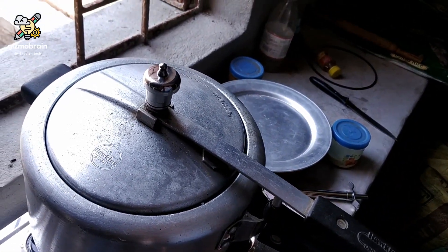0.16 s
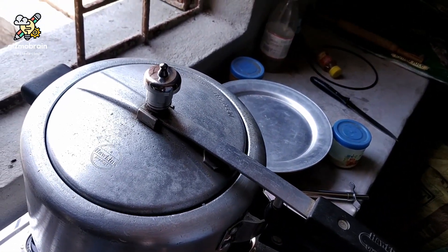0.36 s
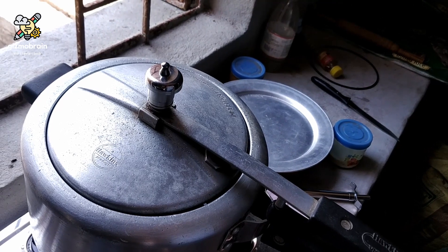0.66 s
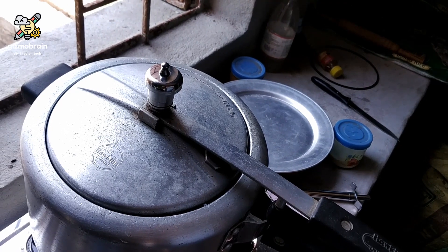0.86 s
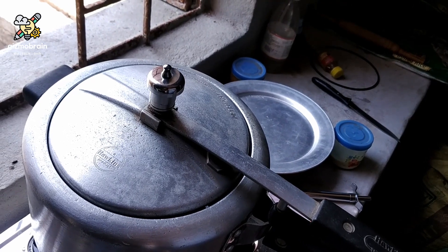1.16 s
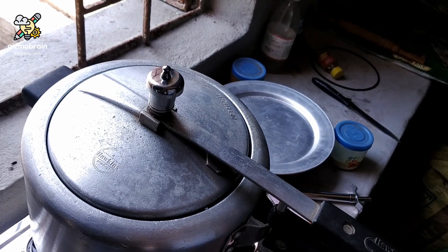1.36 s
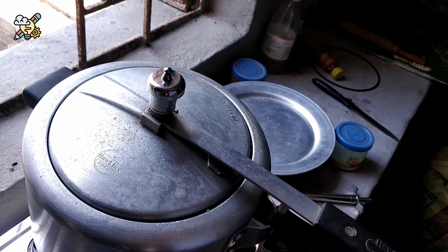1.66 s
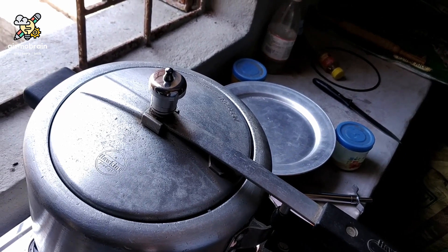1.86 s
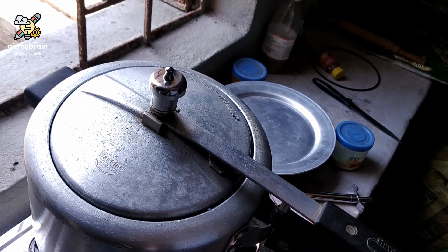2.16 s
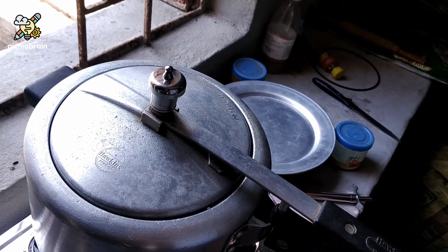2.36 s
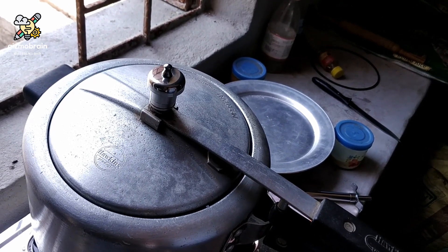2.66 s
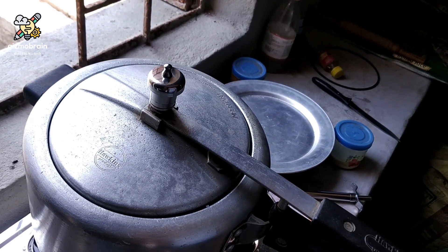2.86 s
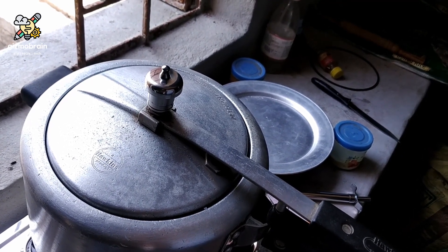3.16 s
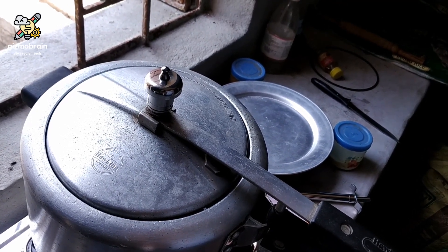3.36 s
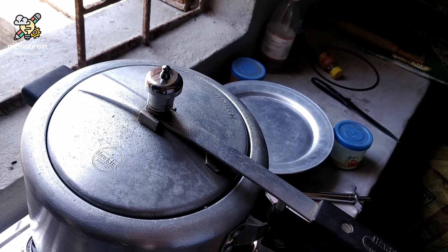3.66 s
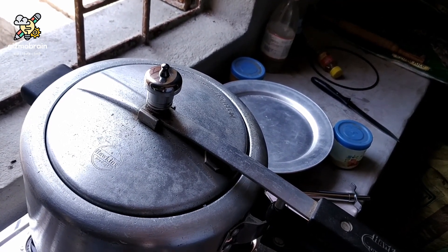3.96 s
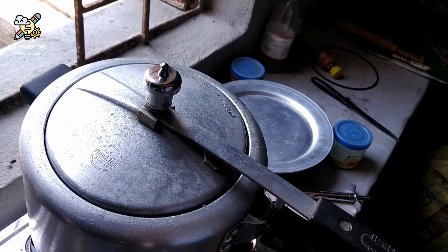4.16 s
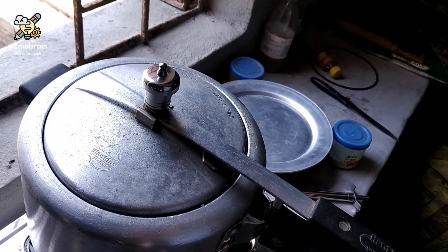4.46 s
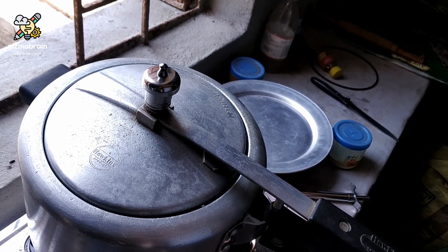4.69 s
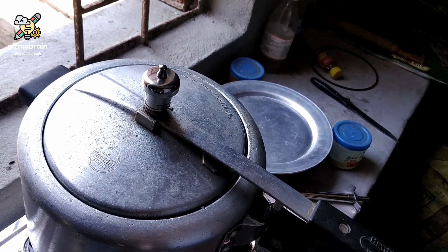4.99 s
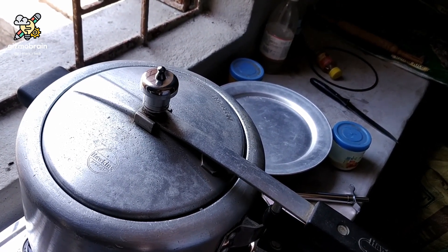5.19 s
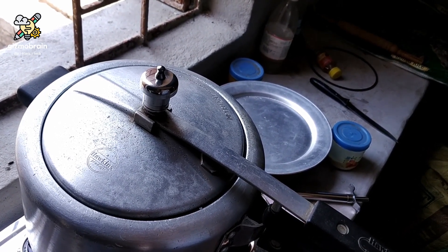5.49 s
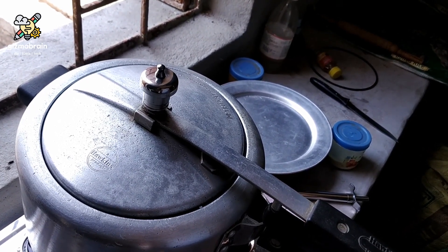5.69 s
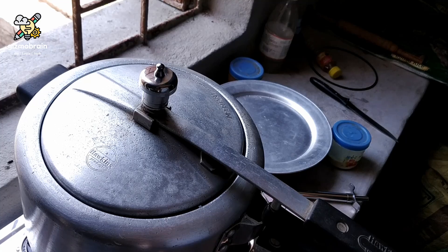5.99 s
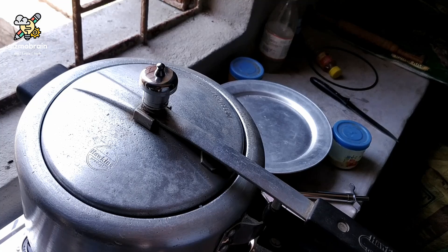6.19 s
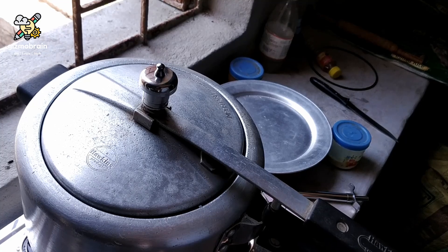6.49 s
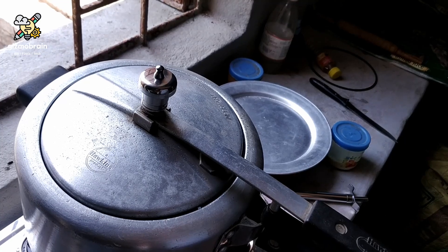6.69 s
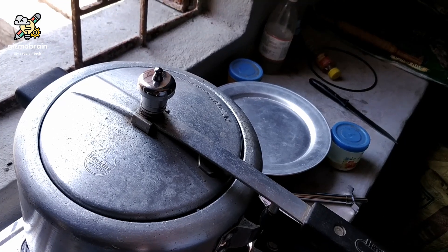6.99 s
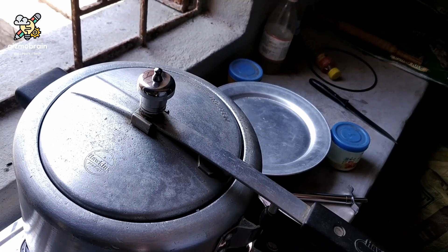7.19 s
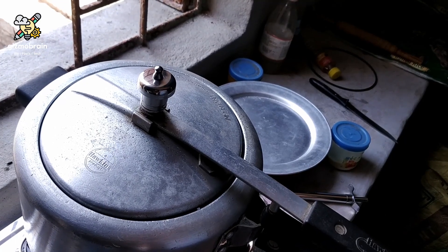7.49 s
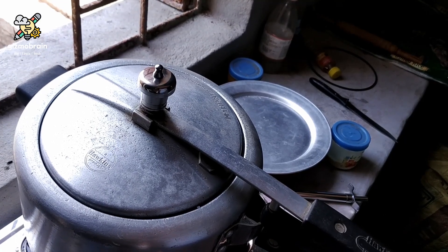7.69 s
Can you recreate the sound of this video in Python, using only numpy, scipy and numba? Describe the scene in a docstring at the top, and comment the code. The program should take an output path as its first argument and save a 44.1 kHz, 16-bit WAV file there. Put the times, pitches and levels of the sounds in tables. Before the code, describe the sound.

Close, bright pressure cooker hiss with wet metallic sputter, two tiny early peeps, a strong burst near two seconds, then a long gradual fade.

```python
"""Steam leaks past the weight of a pressure cooker: its turbulent jet hisses in the treble as noise in bands.
Wet sputter under the weight, uneven noise, sets the modes of the metal lid and weight ringing.
A gas flame rumbles as low noise with two resonances and hums the modes of the pot.
Gliding tones make a few gurgling bubbles inside and two short peeps of the weight.
All reaches one close phone microphone; now and then nearly all but the treble drops out for an instant."""
import sys
import numpy as np
from scipy import signal
from scipy.fft import rfft, irfft
from scipy.io import wavfile
from scipy.ndimage import uniform_filter1d
from numba import njit

SR = 44100
rng = np.random.default_rng(int(sys.argv[2]) if len(sys.argv) > 2 else 0)


def generate_wav(sig):
    """Save sig (samples, or channels by samples) to the path in sys.argv[1] as 16-bit PCM at SR."""
    pcm = np.round(np.clip(np.atleast_2d(sig).T, -1, 1) * 32767).astype(np.int16)
    wavfile.write(sys.argv[1], SR, pcm)


N = 345744
TOP_HZ = 11250  # upper limit of the hiss bands and of the phone


def steam():
    """Jet noise and impact-driven ringing share one leak, whose spurts lift each by its own amount."""
    # gains of the leak: start_s, sputter_db, jet_db
    leak = [(0, -49.5, -43), (.3, -52.5, -43.5), (.55, -52.5, -42), (.62, -56, -50), (.8, -56, -47.5),
            (.96, -55.5, -44.5), (1.22, -52.5, -43), (1.44, -51, -42.5), (1.55, -42, -41),
            (1.68, -38, -36.5), (1.79, -41, -42.5), (1.92, -41, -35.5), (2.07, -39.5, -36.5),
            (2.14, -41.5, -40.5), (2.33, -41, -42), (2.37, -45, -40), (3.2, -46, -38.5), (3.55, -46.5, -41),
            (5.0, -51, -43.5), (6.1, -53.5, -45.5), (6.95, -56.5, -45), (7.84, -57.5, -48.5)]
    # spurts of steam, a swell and fall: centre_s, length_s, sputter_rise_db, jet_rise_db, whistle_rise_db
    spurts = [(0.05, 0.13, -0.5, 3, -13), (0.243, 0.12, 1, 3, 3), (0.361, 0.044, 5.5, 1.5, -2),
              (0.414, 0.035, 1, 5, 7), (1.014, 0.18, 7, 1, -15), (1.138, 0.1, 5, 1, -3),
              (1.628, 0.082, 1, -0.5, 7), (1.83, 0.069, 1.5, -4, 7), (1.913, 0.16, 0, -0.5, 7),
              (2.035, 0.11, 2, 1, 2), (2.14, 0.058, 2, -1, 3.5), (2.279, 0.11, -1, 2.5, 8.5),
              (2.45, 0.073, 1.5, 0.5, 3), (2.747, 0.065, 4, 0, -1), (2.84, 0.076, 3.5, 0.5, 3),
              (3.186, 0.13, 1, 2, -12), (3.514, 0.17, 1.5, -0.5, 2), (3.606, 0.068, 1, 0, 8),
              (3.804, 0.11, 1.5, -1.5, 6), (3.88, 0.072, 3.5, -2.5, -6), (4.683, 0.15, 2.5, -1.5, -2),
              (5.501, 0.21, 0, 3, 9.5), (5.862, 0.049, 1.5, 1.5, -3), (6.511, 0.046, 0, 1, 14),
              (6.61, 0.064, 2, -1, 3), (7.452, 0.065, 0, -2, 11.5)]
    wet_db, dry_db = curve(leak)
    centre_s, length_s, *rises_db = np.transpose(spurts)
    wet_rise, dry_rise, whistle_rise = (bumps(centre_s, length_s, rise) for rise in rises_db)
    wet_db = wet_db + wet_rise
    # the weight whistles 1.5 dB above the sputter gain, apart from its own rises and a slight waver
    whistle_db = wet_db + 1.5 + whistle_rise + 0.15 * walk(18)
    dry_jet = undb(dry_db + dry_rise) * jet()
    return reflect(sputter(wet_db, whistle_db) + dry_jet)


def jet():
    """Turbulent mixing makes broadband noise; cavity resonances lift parts of it into humps."""
    # colour of the open jet: pitch_hz, relative_db_per_hz
    jet_colour = [(710, -64), (1200, -30), (1630, -19.5), (2820, -24.5), (4250, -13.5), (4940, -15.5),
                  (6060, -2.5), (8790, -1.5), (9920, 0), (11100, -27.5), (14400, -103), (22000, -120)]
    # cavity under the weight, relative levels: pitch_hz, width_hz, first_db, last_db
    cavity = [(7790, 180, -4, -2), (8040, 180, -5.5, 0), (8140, 76, 2.5, -3), (8540, 46, 0, -5),
              (8850, 120, -5, 4), (8940, 89, 3, 2.5), (9670, 104, -1, 2.5), (9830, 276, -1.5, -15)]
    # gain of the broad hiss beside the humps: start_s, gain_db
    broad_gain = [(0, 0), (.55, -3.5), (.7, -1), (1.5, -1.5), (2.3, 0.5), (2.6, -1), (4, 1.5), (7.84, 0.5)]
    flutter_db = 1.18 * walk(100)
    open_jet = hiss(jet_colour, flutter_db, own_db=2.5, rate=45, step=.1)
    gas = rng.standard_normal(N) * undb(flutter_db)
    humps = 0
    for hz, width, first_db, last_db in cavity:
        hump_db = np.linspace(first_db, last_db, N) + 2.4 * walk(42)
        # two filters in series narrow each other, so each is 1.5 times as wide
        humps = humps + undb(hump_db) * double_svf(gas, hz, 1.5 * width)
    return undb(curve(broad_gain)[0]) * open_jet + level(humps, -2.54)


def sputter(wet_db, whistle_db):
    """Forced modal vibration: uneven droplets ring lid and weight, and some splash radiates directly."""
    # lid and weight modes, relative levels: pitch_hz, width_hz, level_db
    modes = [(1515, 48, -20.5), (1571, 19.6, -17), (1675, 40, -18), (1885, 19, -16.5), (1904, 14, -15.5),
             (2065, 57, -16.5), (2253, 47, -21), (2386, 31, -18), (2488, 26, -16.5), (2649, 37, -17.5),
             (2933, 47, -21), (3155, 45, -15.5), (3367, 28, -14.5), (3414, 26.5, -11), (3520, 27, -14),
             (3647, 68, -17.5), (3857, 34, -12), (3960, 40, -11.5), (4150, 27.5, -7), (4292, 51, -8.5),
             (4387, 32, -8), (4684, 86, -13.5), (4985, 57, -10.5), (5274, 130, -10), (5427, 35, -8.5),
             (5586, 63, -4), (5877, 51, -6), (6040, 29, -3.5), (6200, 59, 1), (6220, 27, -2.5),
             (6440, 42, -8), (6643, 34, -13.5), (6630, 106, -4), (6670, 56, -8), (6950, 33, -7),
             (7150, 48, -14), (7600, 19, -25), (7550, 30, -8.5)]
    # colour of the splash: pitch_hz, relative_db_per_hz
    splash_colour = [(150, -43), (250, -27), (1240, -20.5), (2060, -25), (2830, -23.5), (3370, -14),
                     (4630, -11.5), (5700, -4.5), (7460, -15), (9770, -1.5), (11100, -28), (14400, -67),
                     (22000, -120)]
    # gains of the lid's ringing beside the splash: start_s, middle_modes_db, other_modes_db
    lid_gain = [(0, -7.5, 3), (.5, -8, -1), (.65, -9.5, 3.5), (1.0, -8.5, 3.5), (1.3, -10.5, 1.5),
                (1.9, -12, 3), (2.33, -12, 2.5), (2.4, -13.5, 1.5), (4, -12.5, 1), (7.84, -13, 2)]
    spit_db = 0.95 * walk(70)
    drops = rng.standard_normal(N) * undb(spit_db)
    weight = [m for m in modes if 5450 < m[0] < 6450]
    middle = [m for m in modes if 1800 < m[0] < 2800]
    other = [m for m in modes if m not in middle + weight]
    middle_db, other_db = curve(lid_gain)
    lid = undb(middle_db) * ring(middle, drops, waver_db=3.0, rate=28)
    lid = lid + undb(other_db) * ring(other, drops, waver_db=3.5, rate=24)
    splash = hiss(splash_colour, .6 * spit_db, own_db=3.0, rate=30, step=.15)
    whistle = ring(weight, drops, waver_db=4.0, rate=28)
    return undb(wet_db) * (lid + undb(-2.0) * splash) + undb(whistle_db) * whistle


def reflect(steam_sound):
    """Destructive interference: reflections off the lid cancel narrow bands of the steam."""
    # narrow gaps: pitch_hz, width_hz, depth_db
    gaps = [(2820, 77, -0.5), (3220, 65, -2.5), (6470, 170, -15), (6890, 110, -6.5), (7540, 140, -2.5),
            (8600, 73, -4), (9400, 390, -4.5)]
    for hz, width, depth_db in gaps:
        cancelled = 1 - undb(min(depth_db, 0))
        steam_sound = steam_sound - cancelled * svf(steam_sound, 1. * hz, 1. * width)
    return steam_sound


def peeps():
    """Brief near-sinusoidal oscillation: short peeps of the weight."""
    # peeps: start_s, start_hz, end_hz, length_s, peak_db
    peep_tones = [(1.004, 6330, 6330, 0.02, -39), (1.148, 6430, 6310, 0.02, -34)]
    return glides(peep_tones)


def flame():
    """Combustion noise drives resonators: a broad roar, the humming pot and two puffing resonances."""
    # levels before the trims below: start_s, rumble_db, burner_tone_db
    flame_levels = [(0, -74.5, -68.5), (.8, -67.5, -67), (1.3, -67, -62.5), (2.1, -70, -64.5),
                    (3.1, -69.5, -67), (3.6, -75.5, -80), (4.9, -81, -78.5), (5.9, -82, -78.5),
                    (7.84, -86.5, -79)]
    # puffs of the rumble: centre_s, rise_db
    puffs = [(.16, 8), (.36, 11), (1.13, 12.5), (1.68, 10), (1.82, 10), (2.74, -1), (3.15, 5), (3.97, 10),
             (4.32, 11), (4.67, 19), (4.91, 13), (5.53, 23), (5.85, 1), (6.6, 10), (6.76, 12), (7.72, 6)]
    # swells of the burner tone: centre_s, rise_db
    swells = [(.02, 30.5), (.69, 14), (1.31, 11.5), (1.96, 8), (3.69, 19), (4.06, 17), (5.67, 13),
              (6.82, 16), (7.43, 13)]
    # flame chamber, then burner resonance; nominal widths, widened below: pitch_hz, width_hz
    resonances = [(149, 14), (477, 8)]
    # colour of the broad rumble: pitch_hz, relative_db_per_hz
    rumble_colour = [(18, -64), (30, -32), (70, -22.5), (142, -3), (333, -10.5), (477, -4), (620, -12.5),
                     (964, -10.5), (1380, -17), (1500, -22), (1950, -49), (3300, -120)]
    # gain of the broad roar and humming pot, before their trims: start_s, gain_db
    roar_gain = [(0, -64.5), (.7, -67), (1.5, -64), (2.2, -65), (3.2, -67.5), (4.3, -71), (5.3, -74.5),
                 (6.3, -76.5), (7.84, -80)]
    # pot body modes, relative levels: pitch_hz, width_hz, level_db
    pot_modes = [(166, 7.3, -10), (180.8, 9.1, 0), (235, 12.4, -0.5), (297.4, 9.4, 0), (330, 13, -5.5),
                 (390, 8.7, -3), (426, 30, -4), (458, 11, 2), (491, 10, -5.5), (540, 23, -8), (573, 21, -3),
                 (663, 24, -6.5), (804, 27, -2.5), (894, 23, -7.5), (980, 16, -9), (1134, 32, -7),
                 (1150, 21, -27), (1314, 26, -7.5)]
    rumble_db, tone_db = curve(flame_levels)
    puff_s, puff_rise_db = np.transpose(puffs)
    swell_s, swell_rise_db = np.transpose(swells)
    rumble_db = rumble_db + bumps(puff_s, 0.16, puff_rise_db)
    tone_db = tone_db + bumps(swell_s, 0.12, swell_rise_db)
    low, tone = (level(double_svf(rng.standard_normal(N), hz, 1.9 * width) * undb(2.0 * walk(12)), 0)
                 for hz, width in resonances)
    flicker_db = 1.7 * walk(10)
    broad = hiss(rumble_colour, flicker_db, own_db=0.5, rate=7, step=0.488)
    pot = ring(pot_modes, rng.standard_normal(N) * undb(flicker_db), waver_db=3.5, rate=8)
    roar = undb(curve(roar_gain)[0]) * (undb(-3.0) * broad + undb(-2.5) * pot)
    return undb(rumble_db - 1.5) * low + roar + undb(tone_db - 7) * tone


def gurgles():
    """Bubble resonance: each bubble inside sounds a short gliding tone."""
    # bubbles: start_s, start_hz, end_hz, length_s, peak_db
    bubbles = [(1.625, 815, 770, 0.039, -55), (1.66, 710, 666, 0.056, -60), (1.68, 600, 570, 0.029, -54),
               (2.25, 790, 795, 0.043, -61), (1.13, 303, 288, 0.042, -61.5), (1.79, 404, 370, 0.16, -62),
               (1.83, 313, 300, 0.068, -60.5), (.33, 827, 840, 0.077, -68), (.5, 864, 800, 0.052, -65),
               (.99, 830, 825, 0.041, -65), (5.84, 890, 885, 0.047, -69), (5.84, 200, 190, 0.038, -67.5)]
    return glides(bubbles)


def dip(sound):
    """Spectral gating: the sound under the treble fades out and back in, but for a narrow band."""
    # drop-outs; a spared band above top_hz changes nothing: centre_s, hold_s, top_hz, spared_hz
    dropouts = [(2.226, 0.0048, 3200, 1700), (2.646, 0.0023, 5200, 1740), (3.034, 0.0024, 4600, 3850),
                (3.648, 0.0012, 4250, 2480), (3.821, .004, 3900, 1600), (4.672, 0.0016, 3400, 150),
                (4.739, 0.0017, 4900, 150), (5.549, 0.0015, 4200, 150), (5.825, 0.0037, 4100, 4300),
                (6.103, 0.045, 4050, 1560), (6.228, 0.0035, 4960, 3380), (6.316, 0.0017, 3700, 2500),
                (6.466, 0.0044, 4740, 2500), (6.528, .002, 3200, 2080), (6.657, 0.0018, 4940, 2090),
                (7.001, 0.0015, 5200, 1600), (7.064, 0.0023, 3900, 4200), (7.234, 0.0036, 5100, 4150),
                (7.766, 0.0017, 4860, 1580)]
    edge_s, spared_width_hz, size = .013, 330, 4096  # size of the window in samples
    t = (np.arange(size) - size // 2) / SR
    hz = np.arange(size // 2 + 1) * SR / size
    out = sound.copy()
    for centre_s, hold_s, top_hz, spared_hz in dropouts:
        start = int(centre_s * SR) - size // 2
        lost = (hz < top_hz) & (np.abs(hz - spared_hz) > spared_width_hz / 2)
        fade = np.cos(np.pi / 2 * np.clip((np.abs(t) - hold_s / 2) / edge_s, 0, 1)) ** 2
        out[start:start + size] -= fade * irfft(rfft(sound[start:start + size]) * lost, size)
    return out


def hiss(points, shared_db, own_db, rate, step):
    """Filtered noise: bands `step` octaves wide share a flutter and each flickers by itself."""
    hz = np.maximum(np.arange(N // 2 + 1) * SR / N, 1)
    point_hz, point_db = np.transpose(points)
    colour_db = np.interp(np.log(hz), np.log(point_hz), point_db)
    colour = rfft(rng.standard_normal(N)) * undb(colour_db)
    place = np.log2(hz / point_hz[0]) / step
    bands = int(np.log2(min(point_hz[-1], TOP_HZ) / point_hz[0]) / step) + 2
    out = 0
    for k in range(bands):
        # overlapping triangular bands
        band = irfft(colour * np.maximum(1 - np.abs(place - k), 0), N)
        out = out + band * undb(own_db * walk(rate))
    return level(out * undb(shared_db), 0)


def ring(modes, drive, waver_db, rate):
    """Modal superposition: modes of alternate sign, each driven from its own wandering spot."""
    out = 0
    for k, (hz, width, db) in enumerate(modes):
        push = drive * undb(db + waver_db * walk(rate))
        out = out + (-1) ** k * svf(push, 1. * hz, 1. * width)
    return level(out, 0)


def glides(table):
    """Frequency modulation: phase sums a gliding pitch, under a half-sine rise and fall."""
    out = np.zeros(N)
    for start_s, start_hz, end_hz, length_s, db in table:
        u = np.linspace(0, 1, int(length_s * SR))
        cycles = np.cumsum(start_hz + (end_hz - start_hz) * u) / SR
        tone = np.sin(2 * np.pi * (cycles + rng.random()))
        out[int(start_s * SR):][:len(u)] += undb(db) * np.sin(np.pi * u) * tone
    return out


@njit
def svf(x, hz, width):
    """Damped resonance: a state-variable band-pass with gain 1 at the centre."""
    y, b, l = np.empty(len(x)), 0., 0.
    g, k = np.tan(np.pi * hz / SR), width / hz
    for i in range(len(x)):
        v = (b + g * (x[i] - l)) / (1 + g * (g + k))
        b, l, y[i] = 2 * v - b, l + 2 * g * v, k * v
    return y


def double_svf(x, hz, width):
    """Cascaded resonance: two equal band-passes in series give steeper skirts."""
    return svf(svf(x, 1. * hz, 1. * width), 1. * hz, 1. * width)


def walk(rate):
    """Smoothed random process: levels held 1 / rate s and slewed twice, with a spread near 1."""
    k = int(SR / rate)
    held = np.repeat(rng.standard_normal(N // k + 1), k)
    return 1.18 * uniform_filter1d(uniform_filter1d(held, k), k)[:N]


def curve(table):
    """Linear interpolation: columns of a table joined by straight lines in time."""
    s, *columns = np.transpose(table)
    return [np.interp(np.arange(N) / SR, s, c) for c in columns]


def bumps(centres, lengths, rises_db):
    """Raised-cosine envelopes: smooth swells in dB, summed, each about its centre."""
    t = np.arange(N) / SR
    return sum(db * np.cos(np.pi * np.clip((t - s) / length, -.5, .5)) ** 2
               for s, length, db in np.broadcast(centres, lengths, rises_db))


def undb(db):
    """Logarithmic level: decibels to amplitude ratio."""
    return 10 ** (np.asarray(db) / 20)


def level(x, db):
    """Mean-square power: scale to an rms level in dB."""
    return x * undb(db) / np.sqrt(np.mean(x ** 2))


def scene():
    """Linear superposition: all sources add at one microphone, written to both channels."""
    mono = steam() + peeps() + flame() + gurgles()
    return np.array([dip(mono)] * 2)


def record(dry):
    """Band limiting: the phone cuts the top with a steep elliptic low-pass."""
    low_pass = signal.ellip(16, .2, 60, TOP_HZ, fs=SR, output="sos")
    return signal.sosfilt(low_pass, dry)


dry = scene()
out = record(dry)
generate_wav(out)
```